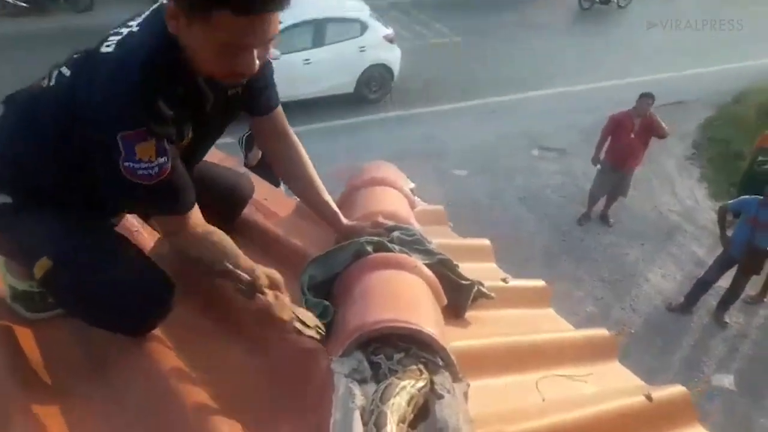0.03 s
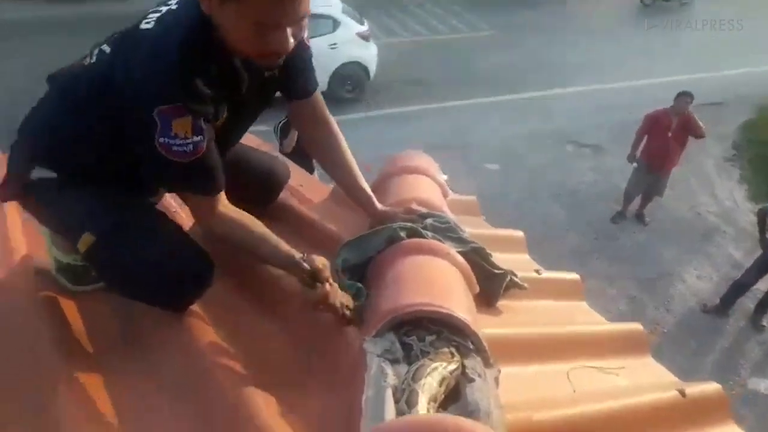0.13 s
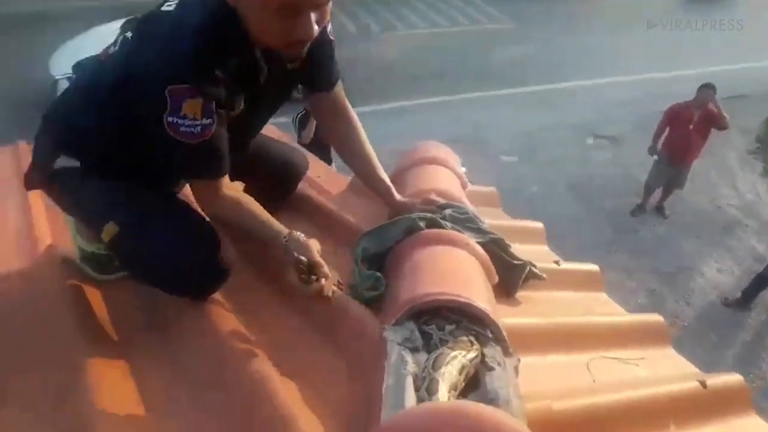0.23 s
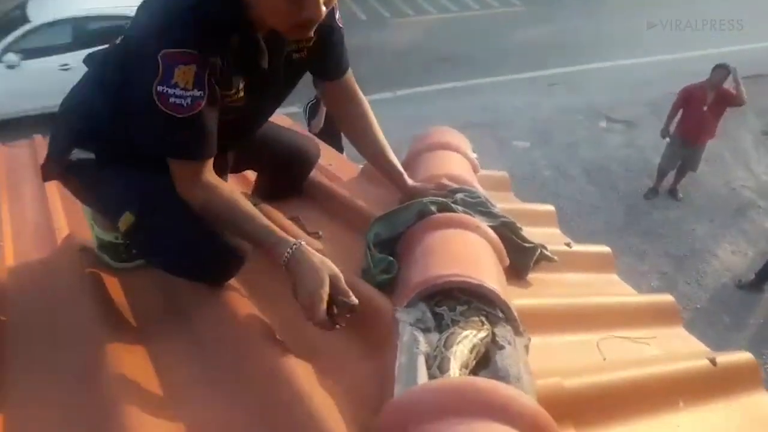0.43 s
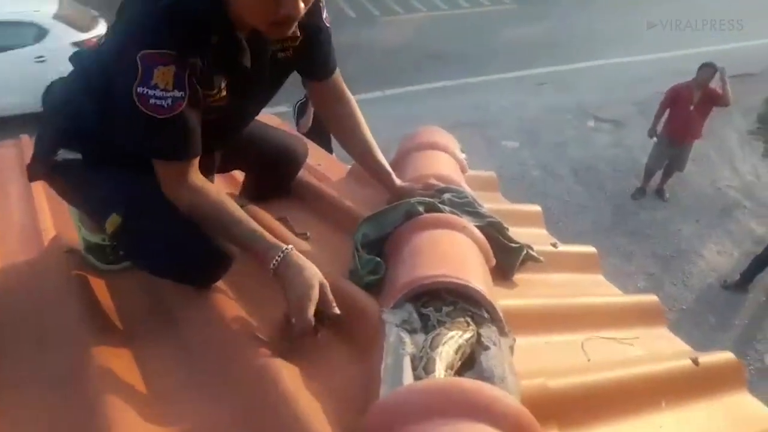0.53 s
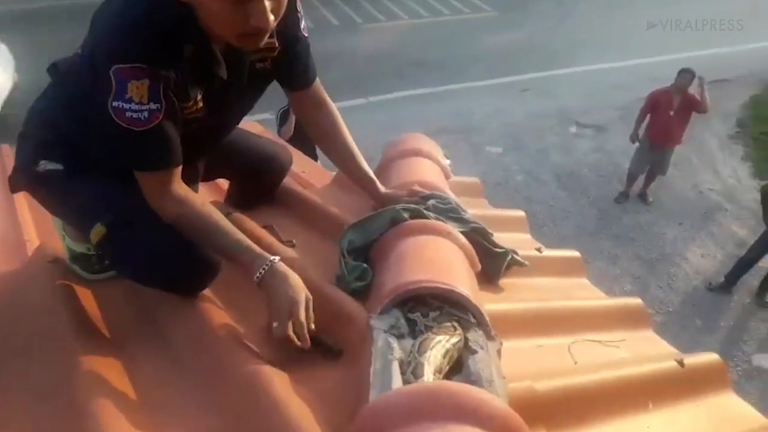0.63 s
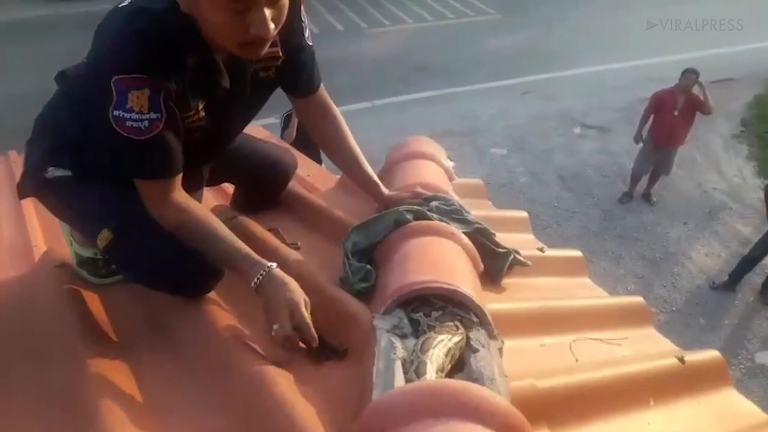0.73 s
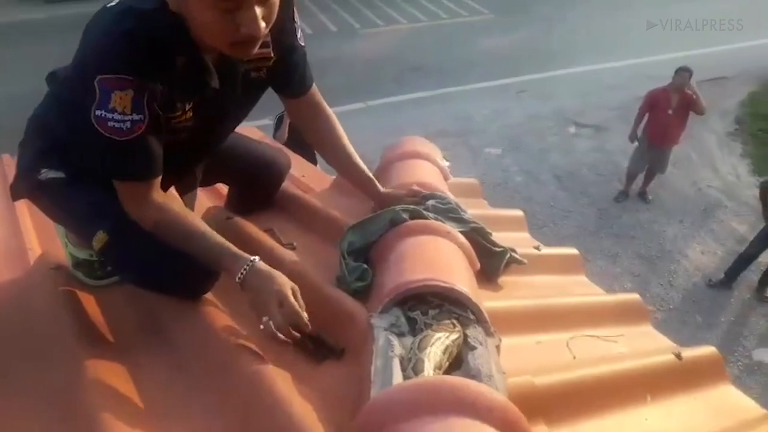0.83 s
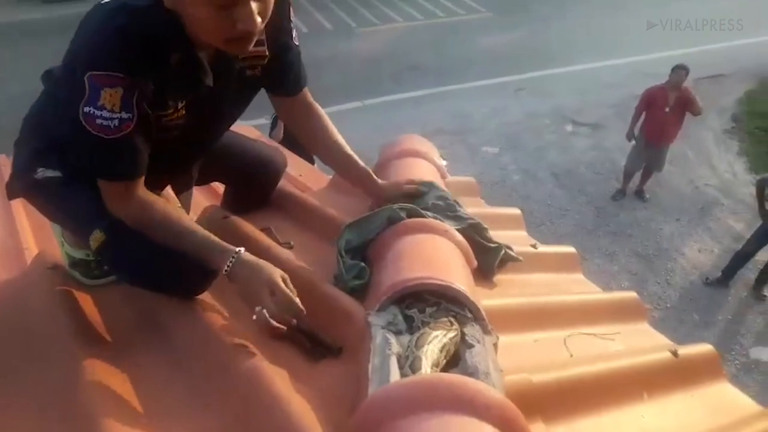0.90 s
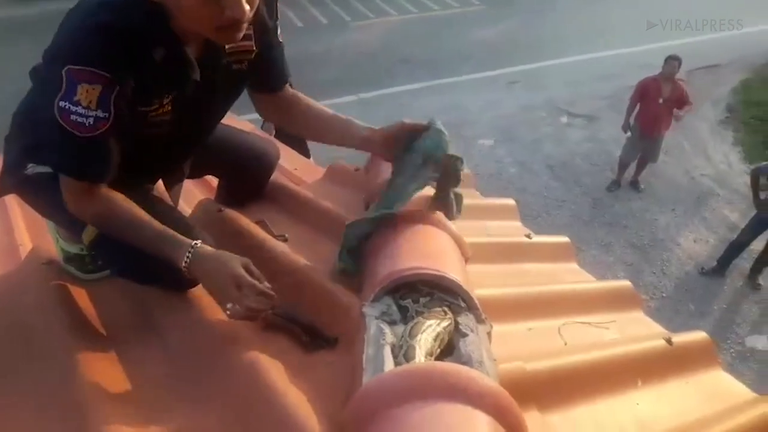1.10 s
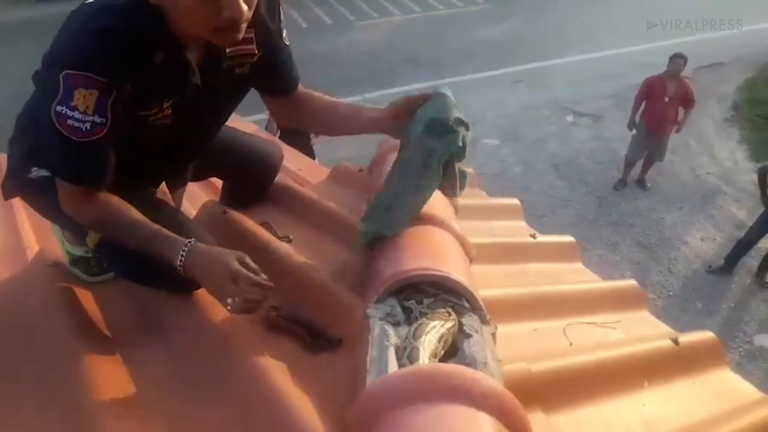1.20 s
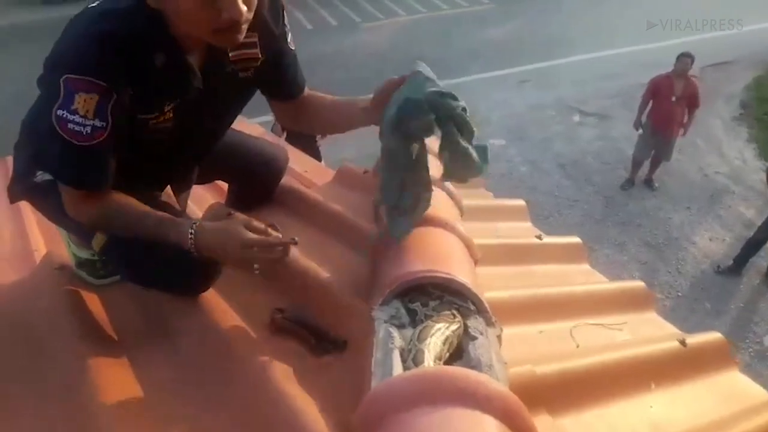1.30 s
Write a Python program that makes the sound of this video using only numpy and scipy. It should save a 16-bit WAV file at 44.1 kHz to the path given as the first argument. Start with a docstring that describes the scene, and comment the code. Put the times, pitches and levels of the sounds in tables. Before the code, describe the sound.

Close, sharp knocks of a tool on hollow roof tiles: one heavy clatter, a pause, then two quick clacks with a brief ring. Behind them, outdoors, tyre noise fades and a small idling engine thumps softly.

```python
"""Tool on roof tiles

A hand tool knocks on roof tiles and is laid down on them, close by, outdoors.
Each knock is a quick clatter of contacts that ring tile and tool and thud in the hollow beneath.
In the street below, tyre noise fades as a car leaves and a small engine thumps at idle."""
import sys
import numpy as np
from scipy import signal
from scipy.fft import rfft, irfft
from scipy.io import wavfile

SR = 44100
rng = np.random.default_rng(int(sys.argv[2]) if len(sys.argv) > 2 else 0)


def wav_record(signal):
    """Record a signal, one row per channel, as 16-bit PCM in the file named by sys.argv[1]."""
    frames = np.transpose(np.atleast_2d(signal))
    bounded = np.clip(frames, -1, 1)
    # unit amplitude maps onto the largest positive 16-bit level
    quanta = np.round(bounded * 32767).astype(np.int16)
    wavfile.write(sys.argv[1], SR, quanta)


N = 59535
T = np.arange(N) / SR
ATTACK_S = 0.00061

# Noise spectra of the car, a contact and the reflections.
# Each row: frequency in Hz, relative density in dB.
TYRE_SPECTRUM = [(100, 1), (300, 0), (550, -3), (900, 0.5), (1600, -2.5), (2500, -9.5), (3400, -24.5),
                 (5200, -30.5), (7500, -53.5), (9800, -47), (11500, -37), (14500, -53.5)]
RUMBLE_SPECTRUM = [(25, -41), (48, -14), (70, 7), (115, 15), (180, 11.5), (280, 3.5), (600, -44.5)]
CLACK_SPECTRUM = [(300, -17.5), (1000, -13.5), (1400, 3.5), (1900, -4.5), (2350, -3), (2750, -12.5),
                  (3600, -24.5), (7000, -60.5)]
THUD_SPECTRUM = [(50, -46.5), (90, -23), (125, -12.5), (250, -4), (440, -12.5), (650, -2.5), (850, 0),
                 (1300, -6.5), (3000, -62.5)]
TICK_SPECTRUM = [(1500, -0.5), (3800, -1.5), (4700, 8), (6500, 0.5), (7600, -12), (10500, -6),
                 (13000, -7.5), (15000, -30)]
SCATTER_SPECTRUM = [(100, -28), (300, -0.5), (800, 3.5), (1500, -4.5), (2400, -8), (4000, -2),
                    (12000, -7.5)]
# Street envelopes. Each row: time in seconds, gain in dB.
TYRE_GAIN_DB = [(0, -29), (.05, -30.5), (.2, -32.5), (.36, -36.5), (.5, -41.5), (.65, -42.5), (.95, -42.5),
                (1.1, -44.5), (1.35, -43.5)]
RUMBLE_GAIN_DB = [(0, -33.5), (.12, -34), (.35, -40.5), (.65, -41), (1, -46), (1.35, -50)]
EXHAUST_GAIN_DB = [(0, -21.5), (.18, -18.5), (.36, -23.5), (.47, -32), (.62, -25), (.9, -29), (1.35, -29)]
# Idle speed. Each row: time in seconds, firing rate in Hz.
FIRING_RATE_HZ = [(0.1, 10.8), (.5, 11.3), (.75, 11.65), (.92, 11.35), (1.02, 10.6), (1.11, 10.9)]
# Modes of exhaust, tile, tool, air space under the tiles and roof frame.
# Each row: frequency in Hz, relative level in dB, T60 in seconds.
EXHAUST_MODES = [(123, -5, 0.022), (173.3, 2.5, 0.047), (231, -7.5, 0.028)]
TILE_MODES = [(578.3, -15.5, 0.15), (825, -13, .12), (1071, -18.5, 0.11), (1218, -21.5, 0.17),
              (1364, -9.5, 0.095), (1607, -4.5, 0.076), (1686, -3, 0.063), (3126, -23, 0.073)]
TOOL_MODES = [(2123, -6, 0.086), (2236.6, -2, 0.064), (2287, -7, 0.064), (2480, -13, 0.02),
              (4650, -25, 0.049)]
HOLLOW_MODES = [(233, -18, 0.054), (386.6, -21, 0.11), (459, -3, 0.059), (519, -7, 0.048), (794, -7, .04)]
FRAME_MODES = [(127.7, -23, 0.29), (249, -23.5, 0.3), (281.6, -27, 0.22)]
# Tool-on-tile contacts. Each row: start in seconds, tile and tool gains in dB, their T60 scale,
# then clack, thud, hollow and tick gains in dB.
CONTACT_EVENTS = [ (0.2206, -28, -1, 0.5, -9.5, -30, -34, -20), (0.2232, -8, -18, 1, -10, -7.5, -18, -23),
                  (0.2301, -20, -19.5, 0.74, -11.5, -13, -45, -50),
                  (0.2376, -11, -13, 0.56, -6.5, -12.5, -29, -37),
                  (0.2406, -7, -11, 0.66, -7.5, -17.5, -19, -48),
                  (0.2483, -18.5, -26, 0.6, -15.5, -15, -21.5, -47.5),
                  (0.2570, -37.5, -31.5, .8, -31, -24.5, -44, -48),
                  (0.2670, -24, -33, 0.6, -38, -18.5, -28, -55),
                  (0.2746, -37, -31, 0.4, -29, -23, -48.5, -42.5),
                  (0.6775, -16, -15.5, 1, -8, -22.5, -24.5, -42),
                  (0.6818, -7, -13.5, 0.69, -14, -20.5, -31, -48),
                  (0.6959, -29.5, -30.5, .7, -21.5, -22.5, -38, -60.5),
                  (0.7090, -38, -31, 0.9, -27, -35, -35, -59),
                  (0.7327, -25.5, -25, 1, -17, -21.5, -22, -53.5),
                  (0.8186, -18, -25, 0.73, -20.5, -23.5, -9, -52),
                  (0.8278, -30, -14, 0.7, -6.5, -21, -33, -26),
                  (0.8332, -5, -3.5, 0.11, -20, -29, -18.5, -55), ]


def undb(db):
    """Decibels to gain."""
    return 10 ** (np.asarray(db) / 20)


def curve(points):
    """Straight lines through (seconds, value) points."""
    return np.interp(T, *np.array(points).T)


def rise(tau_s):
    """Exponential onset from 0 to 1."""
    return 1 - np.exp(-T / tau_s)


def decay(t60_s):
    """Exponential decay, 60 dB down at t60_s."""
    return np.exp(-np.log(1000) * T / t60_s)


def noise(spectrum):
    """Coloured noise of unit rms."""
    hz, db = np.array(spectrum).T
    bins_hz = np.maximum(np.arange(N // 2 + 1) * SR / N, 1)
    gain = undb(np.interp(np.log(bins_hz), np.log(hz), db))
    coloured = irfft(rfft(rng.standard_normal(N)) * gain, N)
    return coloured / coloured.std()


def burst(spectrum, t60_s):
    """Dense resonances as decaying noise, scaled to the energy of its envelope."""
    envelope = decay(t60_s) * rise(ATTACK_S)
    shaped = noise(spectrum) * envelope
    return shaped * np.sqrt(np.sum(envelope ** 2) / np.sum(shaped ** 2))


def ring(modes):
    """Sum of decaying modes after one blow."""
    return sum(undb(db) * np.sin(2 * np.pi * hz * T) * decay(t60_s) for hz, db, t60_s in modes)


def add(out, start_s, sound):
    """Mix a sound in from start_s."""
    i = int(np.clip(start_s * SR, 0, N - 1))
    out[i:] += sound[:N - i]


def leaving_car():
    """Tyre noise and low rumble fade with distance."""
    tyres = noise(TYRE_SPECTRUM) * undb(curve(TYRE_GAIN_DB))
    rumble = noise(RUMBLE_SPECTRUM) * undb(curve(RUMBLE_GAIN_DB))
    return tyres + rumble


def idling_engine(first_firing_s=0.079, rise_s=0.0023, jitter_db=1):
    """Slow firings, each a soft puff that rings the exhaust."""
    cycles = np.cumsum(curve(FIRING_RATE_HZ)) / SR
    cycles -= np.interp(first_firing_s, T, cycles)
    firings_s = np.interp(np.arange(int(cycles[-1]) + 1), cycles, T)
    puff = ring(EXHAUST_MODES) * rise(rise_s)
    out = np.zeros(N)
    for start_s in firings_s:
        add(out, start_s, puff * undb(jitter_db * rng.standard_normal()))
    return out * undb(curve(EXHAUST_GAIN_DB))


def contact_ring(modes, t60_scale, spot_db=1.0):
    """Mode levels vary with the spot struck; pressure shortens the ring."""
    return ring([(hz, db + spot_db * rng.standard_normal(), t60_s * t60_scale)
                 for hz, db, t60_s in modes])


def knocks():
    """Each contact rings tile, tool and the hollow below, with a clack, a thud and a sharp tick."""
    out = np.zeros(N)
    for start_s, tile_db, tool_db, t60_scale, clack_db, thud_db, hollow_db, tick_db in CONTACT_EVENTS:
        tile = undb(tile_db) * contact_ring(TILE_MODES, t60_scale)
        tool = undb(tool_db) * contact_ring(TOOL_MODES, t60_scale)
        hollow = undb(hollow_db) * ring(HOLLOW_MODES)
        clack = undb(clack_db) * burst(CLACK_SPECTRUM, t60_s=0.037)
        thud = undb(thud_db) * burst(THUD_SPECTRUM, t60_s=0.039)
        tick = undb(tick_db) * burst(TICK_SPECTRUM, t60_s=0.036)
        add(out, start_s, (tile + tool + hollow) * rise(ATTACK_S) + clack + thud + tick)
    return out


def reflections(direct, delay_s=0.009, roof_db=-16.5, roof_t60_s=0.17, yard_db=-34, yard_t60_s=0.82):
    """Short scatter from roof and walls, and a faint longer tail from the yard."""
    response = np.zeros(N)
    for db, t60_s in ((roof_db, roof_t60_s), (yard_db, yard_t60_s)):
        tail = burst(SCATTER_SPECTRUM, t60_s)
        add(response, delay_s, undb(db) * tail / np.linalg.norm(tail))
    return signal.fftconvolve(direct, response)[:N]


def roof_frame(start_s=0.232, rise_s=0.008):
    """The first, heaviest knock shakes the frame into a low boom."""
    out = np.zeros(N)
    add(out, start_s, ring(FRAME_MODES) * rise(rise_s))
    return out


def scene():
    """Knocks on the roof above the street, mono."""
    direct = knocks()
    roof = direct + reflections(direct) + roof_frame()
    street = leaving_car() + idling_engine()
    return (roof + street)[None, :]


def record(dry, low_cut_hz=64.5, ceiling=0.93, high_cut_hz=14800):
    """The microphone cuts deep bass, clips the loudest peaks and cuts the top."""
    highpass = signal.butter(4, low_cut_hz, "high", fs=SR, output="sos")
    lowpass = signal.ellip(10, 0.2, 90, high_cut_hz, fs=SR, output="sos")
    clipped = np.clip(signal.sosfilt(highpass, dry), -ceiling, ceiling)
    return signal.sosfilt(lowpass, clipped)


dry = scene()
out = record(dry)
wav_record(out)
```